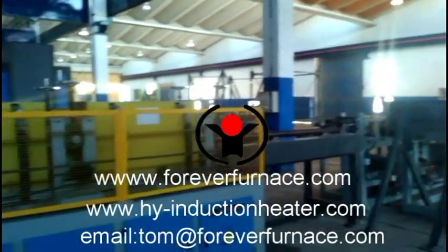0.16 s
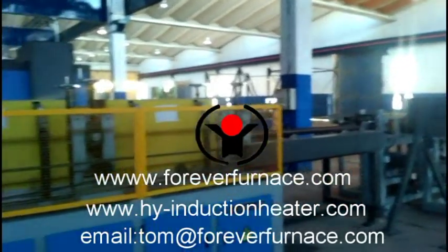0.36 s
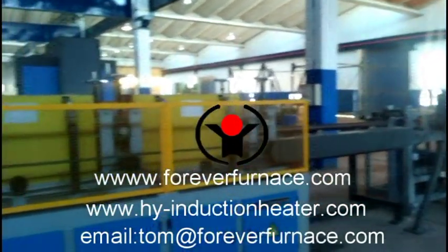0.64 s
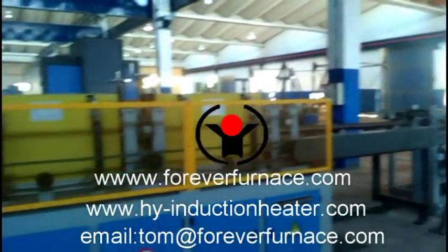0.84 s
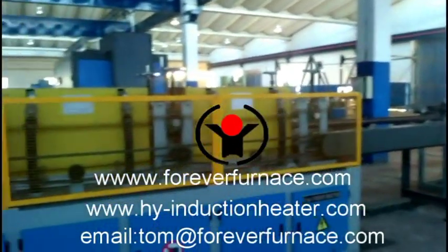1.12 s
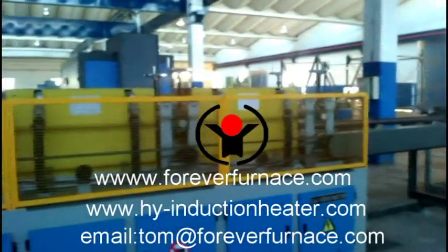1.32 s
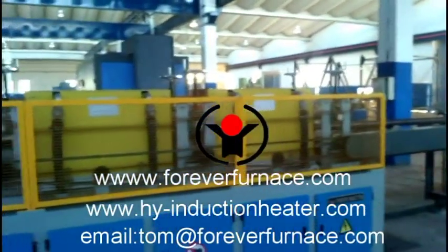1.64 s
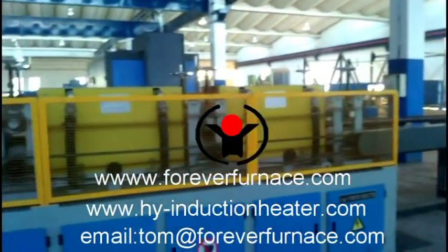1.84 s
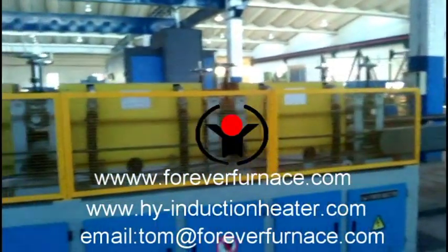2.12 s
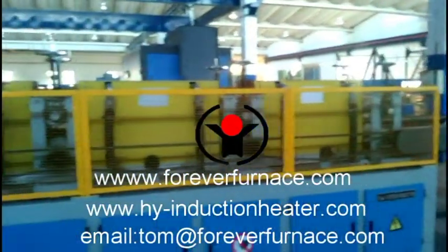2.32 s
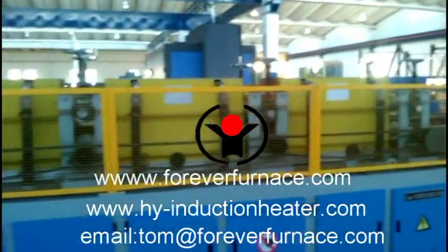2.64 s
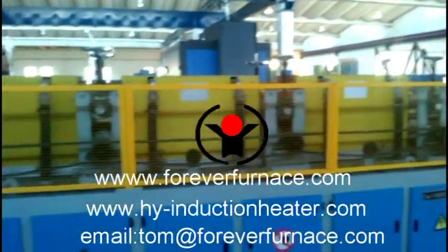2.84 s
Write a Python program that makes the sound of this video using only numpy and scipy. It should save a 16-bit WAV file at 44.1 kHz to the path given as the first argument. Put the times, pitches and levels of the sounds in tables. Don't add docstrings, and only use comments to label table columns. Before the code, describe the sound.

A heating machine's broad airy roar runs throughout a large factory hall, its steel housings ringing. A steady-pitched whine and pump note swell and fade as a small hand-held microphone moves; the extreme treble is dull and patchy.

```python
import sys
import numpy as np
from scipy import signal
from scipy.fft import rfft, irfft, next_fast_len
from scipy.io import wavfile
from scipy.ndimage import uniform_filter1d, minimum_filter1d

SR = 44100
rng = np.random.default_rng(int(sys.argv[2]) if len(sys.argv) > 2 else 0)


def invert_db(x):
    u = np.asarray(x, float) / 20
    return 10 ** u


def wav_out(sig):
    wavfile.write(sys.argv[1], SR, np.round(np.clip(np.atleast_2d(sig).T, -1, 1) * 32767).astype(np.int16))


N = 130977

# pitch_hz, level_db (per Hz)
ROAR_SPECTRUM = [(65, -41), (250, -5), (800, -1.5), (1700, -3.5), (2900, -14), (4100, -24), (5900, -44),
                 (9200, -66.5)]
# time_s, tilt_db_per_octave (about 1 kHz)
MIC_FACING = [
    (0, 1.1),
    (.4, 1.25),
    (.8, 0.84),
    (1.2, -0.34),
    (1.6, 1),
    (2, 1),
    (2.4, 0.53),
    (2.7, 0.6),
    (2.97, -0.7),
]
# time_s, lift_db
SPRAY_LIFT = [(0, 2), (.2, 2), (.5, 1.1), (.75, -1.5), (1, 1.5), (1.25, 4), (1.5, 0), (1.7, 0.5), (1.9, 1),
              (2.2, 2.5), (2.5, 1.1), (2.97, 0)]
HOUSING_PITCH = [480, 578, 755, 871, 1061, 1180, 1379, 1550, 2013, 2659, 3646, 5030]
# width_hz, level_db (rms)
HOUSING_RING = [(12, -41), (11.8, -39), (25, -38.5), (16, -39), (22, -36.5), (26, -33.5), (18, -43),
                (21.6, -37), (45, -37), (18, -53), (20, -54.5), (16, -68.5)]
# middle_s, pitch_hz, length_s, level_db (rms)
RING_SPOTS = [(0.204, 1228, 0.19, -27), (0.362, 830, 0.28, -26.5), (.38, 777, 0.33, -30.5),
              (0.592, 480.5, .28, -23.5), (0.619, 992, 0.3, -30.5), (0.855, 875, 0.47, -33.5),
              (0.887, 573.7, 0.37, -33), (1.116, 1527, 0.14, -28.5), (1.4, 1180, 0.11, -27.5),
              (1.5, 866, .3, -33), (1.738, 1426, 0.17, -30.5), (1.803, 1229, .24, -29),
              (1.923, 1122, 0.25, -29.5), (2.097, 492.6, 0.13, -32), (2.217, 2010, 0.27, -34.5),
              (2.557, 1674, 0.15, -37.5), (2.657, 1072, 0.18, -27.5), (2.837, 763, 0.35, -30.5),
              (2.863, 869, .2, -35)]
# time_s, level_db (rms)
WHINE_LEVEL = [(0, -35), (.2, -30), (.45, -34), (.7, -23), (.88, -27), (1.05, -22.5), (1.25, -23),
               (1.45, -35), (1.6, -28.5), (1.9, -32), (2.1, -36), (2.35, -32.5), (2.46, -28), (2.65, -30),
               (2.97, -43.5)]
# multiple, level_db (rms)
WHINE_OVERTONES = [
    (2.0015, -60),
    (3.001, -80),
    (4, -92),
]
# time_s, level_db (rms)
PUMP_LEVEL = [(0, -26.5), (.25, -25), (.5, -31), (.75, -27), (.95, -45.5), (1.3, -34), (1.6, -31),
              (1.85, -29.5), (2.1, -36), (2.45, -38), (2.6, -29.5), (2.97, -40)]
# multiple, level_db (rms)
PUMP_UPPER = [
    (2, -55),
    (5.01, -94),
]
# time_s, level_db (rms)
HUM_LEVEL = [(0, -33), (.4, -37), (.8, -35), (1.1, -28.5), (1.4, -30), (1.75, -36.5), (2.1, -34),
             (2.35, -33), (2.5, -39), (2.65, -26.5), (2.97, -32)]
# middle_s, length_s, low_hz, high_hz
LOST_BANDS = [(.17, .02, 6000, 9000), (.24, .03, 5100, 5600), (.265, .035, 4700, 5500),
              (.41, .02, 6500, 9000), (.525, .015, 4800, 5500), (.61, .015, 4800, 5500),
              (.66, .05, 7000, 9900), (.725, .04, 4200, 5000), (.76, .03, 6400, 9900),
              (1.04, .015, 5000, 6200), (1.155, .03, 5100, 6500), (1.22, .04, 5100, 6200),
              (1.26, .03, 6200, 7500), (1.35, .04, 6000, 7500), (1.42, .05, 6200, 9900),
              (1.53, .05, 7500, 9900), (1.68, .12, 7500, 9900), (1.755, .035, 4700, 5600),
              (2.05, .03, 4800, 6200), (2.08, .04, 6200, 7500), (2.2, .03, 5600, 7500),
              (2.38, .02, 5600, 7500), (2.45, .06, 6200, 7500), (2.59, .02, 4700, 5500),
              (2.72, .02, 5100, 7500), (2.95, .02, 4700, 5500)]


def rms_one(x):
    return x / np.sqrt(np.mean(x ** 2) + 1e-20)


def in_time(rows):
    return np.interp(np.arange(N) / SR, *np.transpose(rows))


def drift(rate_hz):
    r = np.exp(-2 * np.pi * rate_hz * 40 / SR)
    noise = rng.standard_normal(N // 40 + 2002)
    slow = signal.lfilter([1], [1, -2 * r, r * r], noise)[2000:]
    return np.interp(np.arange(N) / 40, np.arange(len(slow)), rms_one(slow - slow.mean()))


def roar():
    level_db, slow_db, fast_db, top_fall_db_per_octave = -18.5, 0.82, 0.85, -57
    size = next_fast_len(N)
    octave = np.log2(np.maximum(np.arange(size // 2 + 1) * SR / size, 1) / 1000)
    hz, db = np.transpose(ROAR_SPECTRUM)
    corner = np.log2(hz / 1000)
    colour_db = np.interp(octave, corner, db) + top_fall_db_per_octave * np.maximum(octave - corner[-1], 0)
    colour = rfft(rng.standard_normal(size)) * invert_db(colour_db)
    tilt, spray = in_time(MIC_FACING), in_time(SPRAY_LIFT)
    out = 0
    for centre in np.arange(-6, 4.1, 1 / 3):
        band = np.cos(np.pi / 2 * np.clip(3 * (octave - centre), -1, 1)) ** 2
        gain_db = tilt * np.clip(centre, -2, 1) + spray * np.clip(centre - 1, 0, 1)
        gain_db = gain_db + slow_db * drift(1.0) + fast_db * drift(16)
        out = out + invert_db(gain_db) * irfft(colour * band, size)[:N]
    return invert_db(level_db) * rms_one(out)


def ring(hz, width_hz):
    r = np.exp(-np.pi * width_hz / SR)
    section = [1, 0, -1, 1, -2 * r * np.cos(2 * np.pi * hz / SR), r * r]
    noise = rng.standard_normal(N + SR // 4)
    return rms_one(signal.sosfilt([section, section], noise)[-N:])


def tone(hz, rise_hz_per_s, level_db, multiple=1, wobble_rad=.4, flutter_db=0.5):
    t = np.arange(N) / SR
    phase = multiple * 2 * np.pi * (hz * t + rise_hz_per_s * t * t / 2) + wobble_rad * drift(6.7)
    return np.sqrt(2) * invert_db(level_db + flutter_db * drift(9.9)) * np.sin(phase)


def housings():
    t = np.arange(N) / SR
    out = np.zeros(N)
    for hz, (width_hz, level_db) in zip(HOUSING_PITCH, HOUSING_RING):
        out += ring(hz, width_hz) * invert_db(level_db - 1.5 * drift(2.2))
    for middle, hz, length, level_db in RING_SPOTS:
        passing = np.exp(-(2 * (t - middle) / length) ** 2)
        out += tone(hz, 0, level_db, wobble_rad=.8, flutter_db=3.0) * passing
    return out


def inverter():
    hz, rise_hz_per_s = 2260.3, 2.2
    out = tone(hz, rise_hz_per_s, in_time(WHINE_LEVEL))
    for multiple, level_db in WHINE_OVERTONES:
        out += tone(hz, rise_hz_per_s, level_db + 1.6 * drift(0.99), multiple)
    return out


def pump():
    hz, rise_hz_per_s = 1647.3, 1.2
    out = tone(hz, rise_hz_per_s, in_time(PUMP_LEVEL))
    for multiple, level_db in PUMP_UPPER:
        out += tone(hz, rise_hz_per_s, level_db + 2.5 * drift(1.6), multiple)
    return out


def rectifier():
    return tone(300.0, 0, in_time(HUM_LEVEL), flutter_db=2.5)


def scene():
    start_fade_s, end_fade_s = .0004, .002
    t = np.arange(N) / SR
    ease = np.clip(np.minimum(t / start_fade_s, (t[-1] - t) / end_fade_s), 0, 1)
    machines = roar() + housings() + inverter() + pump() + rectifier()
    return (machines * np.sin(np.pi / 2 * ease) ** 2)[None]


def starve(x):
    drop_db, starve_hz, spread_hz, keep_over_db, ragged = -19, 8500, 1300, 9, -.9
    hiss_db, hiss_patch_db = -87, 20
    hz, s, z = signal.stft(x, SR, "hann", 1024, 768)
    row_hz = hz[:, None]

    blocks = rng.standard_normal((2, len(hz) // 6 + 1, len(s) // 4 + 1))
    blocks[0] += .8 * rng.standard_normal(len(s) // 4 + 1)
    blocks = uniform_filter1d(blocks, 2).repeat(6, axis=1).repeat(4, axis=2)
    chance, own = blocks[:, :len(hz), :len(s)]

    lost = (row_hz // 258 * 258 > starve_hz + spread_hz * chance) & (row_hz > 6200)
    for middle, length, low, high in LOST_BANDS:
        in_band = (row_hz > low) & (row_hz < high)
        lost |= in_band & (abs(s - middle) < length / 2 + .004) & (own > ragged)

    steady = uniform_filter1d(abs(z[0]), 9)
    floor = uniform_filter1d(minimum_filter1d(steady, 9, axis=0), 9, axis=0)
    lost &= steady < invert_db(keep_over_db) * floor

    patch = uniform_filter1d(uniform_filter1d(own, 60, axis=0), 8)
    hiss = signal.stft(rng.standard_normal(N), SR, "hann", 1024, 768)[2]
    hiss = hiss * invert_db(hiss_db + hiss_patch_db * patch - row_hz / 2000)
    left = z * np.where(lost, invert_db(drop_db), 1) + hiss
    return signal.istft(left, SR, "hann", 1024, 768)[1][..., :N]


def top_cut(x):
    return signal.sosfilt(signal.butter(12, 14600, fs=SR, output="sos"), x)


def record(dry):
    level_db, span = -18, int(0.015 * SR)
    power = uniform_filter1d(uniform_filter1d(dry ** 2, span), span)
    power = uniform_filter1d(power, span // 2)
    held = dry * (power / power.mean()) ** -0.5
    mix = starve(invert_db(level_db) * rms_one(held))
    return top_cut(mix)


dry = scene()
out = record(dry)
wav_out(out)
```